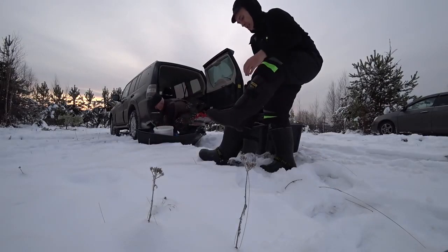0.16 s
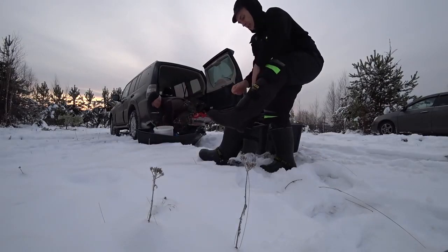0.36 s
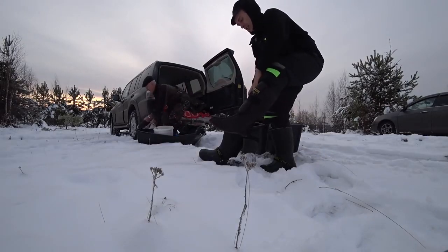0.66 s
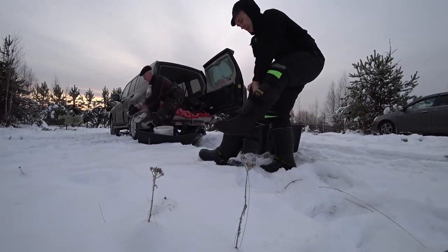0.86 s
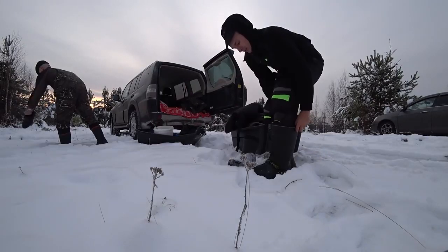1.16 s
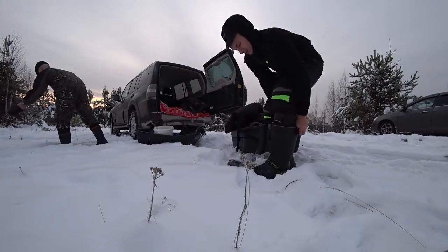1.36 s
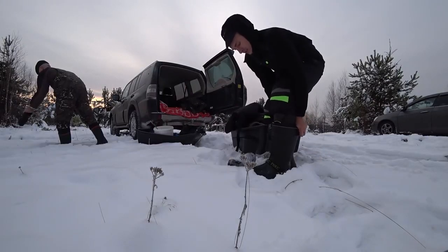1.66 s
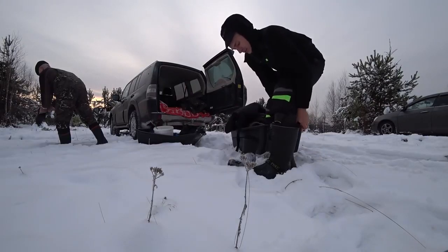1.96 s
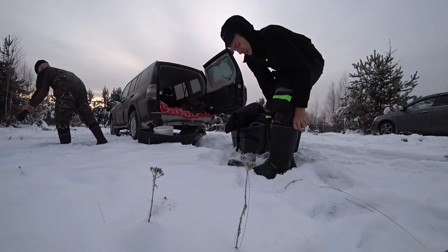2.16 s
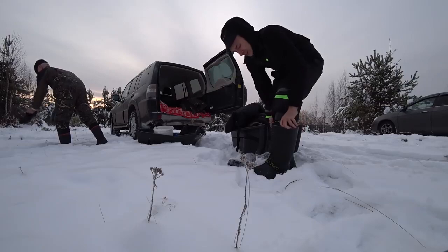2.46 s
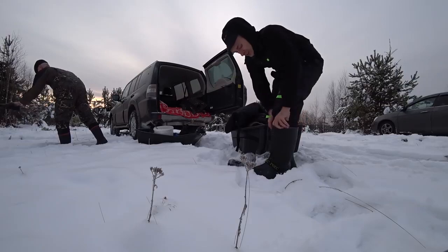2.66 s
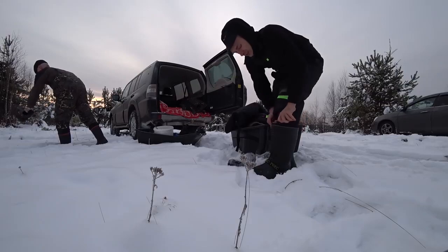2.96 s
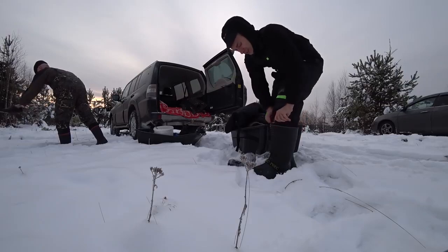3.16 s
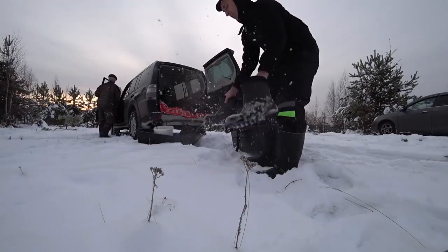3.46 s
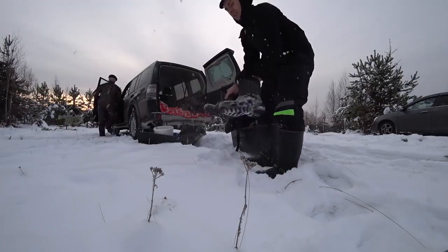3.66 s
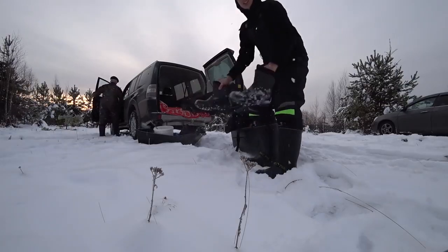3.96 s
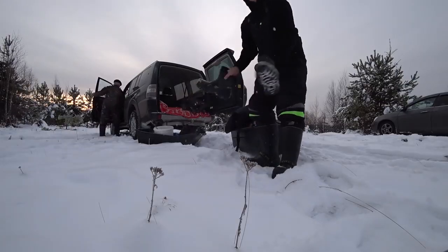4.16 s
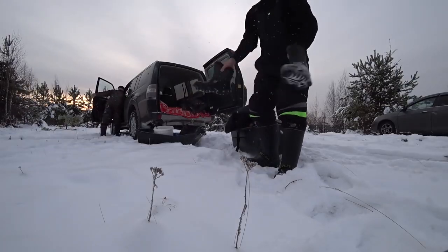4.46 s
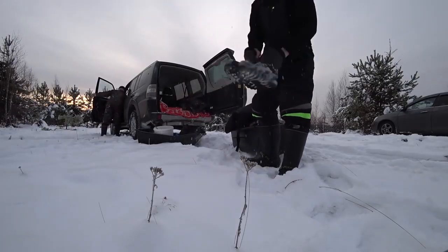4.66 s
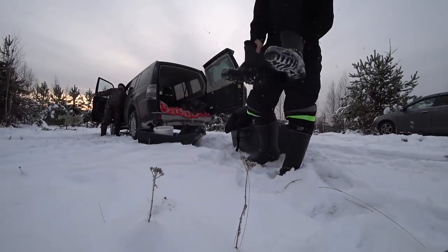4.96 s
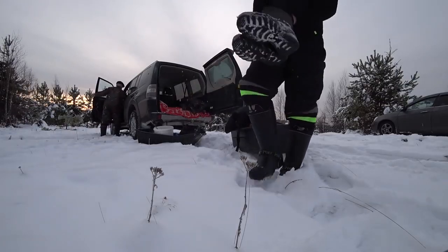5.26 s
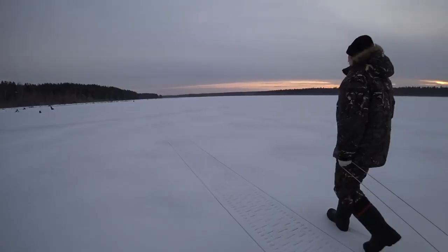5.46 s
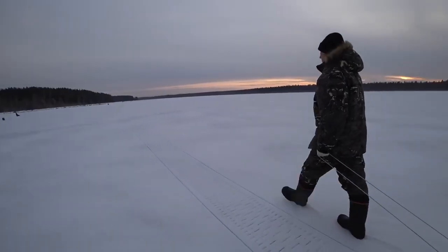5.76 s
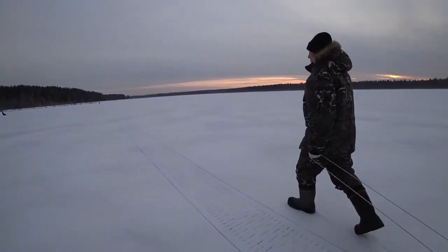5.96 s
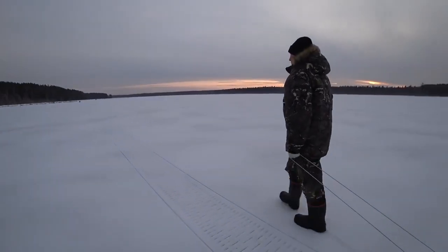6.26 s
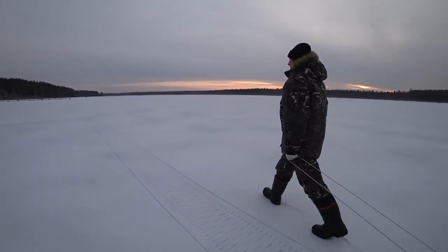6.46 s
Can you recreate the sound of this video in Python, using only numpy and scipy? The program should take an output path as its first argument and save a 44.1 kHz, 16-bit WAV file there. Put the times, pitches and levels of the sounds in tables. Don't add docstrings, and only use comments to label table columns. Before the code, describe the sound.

A still snowy yard, heard within arm's reach, dry and open. From 0 to 1 s there is cloth rustle, soft scuffs, faint far steps and a few dull bumps and ticks. At 1.1 s a frozen boot, left of centre, is struck hard: hollow rubber thud, brittle ice crack, scraping and a shower of crumbs. More sharp knocks follow near 1.6, 2.06, 2.47 and 2.94 s, crumbs fading between them. Around 3.3 s light taps and rustling mark the boots changing hands. Sole-on-sole claps sound in front at 3.8, 4.3, 4.75 and 5.15 s, with rattles, cracks and falling bits. At 5.44 s it cuts abruptly to an open lake: a steady sled hiss grows, wind rumbles unevenly on the microphone, and boots crunch close by, strongest near 5.8, 5.95 and 6.4 s, until the end.

```python
import sys
import numpy as np
from scipy import signal
from scipy.fft import rfft, irfft, next_fast_len
from scipy.io import wavfile
from scipy.ndimage import uniform_filter1d

SR = 44100
rng = np.random.default_rng(int(sys.argv[2]) if len(sys.argv) > 2 else 0)


def natural_amplitude(level_db):
    exponent = np.asarray(level_db, float) / 20
    return 10 ** exponent


def bounce(signal):
    frames = np.transpose(np.atleast_2d(signal))
    limited = np.clip(frames, -1, 1)
    pcm = np.round(limited * 32767).astype(np.int16)
    wavfile.write(sys.argv[1], SR, pcm)


N = 290839

# (frequency [Hz], density [dB per Hz])
YARD_COLOUR = [(15, -37), (30, 4), (124, 6), (254, -3.5), (353, -6), (778, -2.5), (862, -4.5), (1060, -7),
               (1850, -8.5), (4180, -10), (11000, -18), (11250, -19), (11500, -75), (22000, -120)]
LAKE_COLOUR = [(15, -29), (24, 8), (45, -7), (69, -9), (207, -10), (303, -4), (588, -8.5), (884, -9.5),
               (1800, -10), (4180, -11.5), (8970, -16.5), (10200, -15.5), (11000, -19), (11250, -20),
               (11500, -75), (22000, -120)]
# (frequency [Hz], likeness [0-1])
YARD_SAME = [(60, 1), (170, 0.82), (490, 0.61), (1390, 0.39), (3970, 0.89), (11300, 0.6)]
LAKE_SAME = [(60, 0.89), (170, 0.91), (490, 0.96), (1390, 0.58), (3970, 0.79), (11300, 0.36)]
# (frequency [Hz], left over right [dB])
YARD_PAN = [(1000, -0.2)]
LAKE_PAN = [(60, -1.5), (220, -0.5), (820, -4.5), (3060, -3), (11300, -2.5)]
# (time [s], level [dB])
RUMBLE = [(0.0, -61.5), (0.55, -57), (0.73, -65), (1.3, -52), (1.34, -63), (1.74, -65), (2.19, -56),
          (2.4, -69), (2.81, -64), (3.13, -67), (3.33, -61), (3.38, -55), (3.6, -53), (3.88, -56),
          (4.09, -63), (4.37, -52), (4.97, -59.5), (5.3, -58), (5.43, -59)]
# (time [s], level [dB])
WIND = [(5.45, -45), (5.56, -43), (5.69, -49), (5.78, -43), (5.83, -42), (5.87, -49), (5.91, -42),
        (6.0, -44), (6.1, -47), (6.25, -44), (6.3, -51), (6.38, -42), (6.44, -48), (6.5, -48), (6.53, -41),
        (6.59, -48)]
# (peak time [s], level [dB], rise [s per 10 dB], fall [s per 10 dB], sheen re level
# [dB])
RUSTLES = [(0.0, -52, .1, .3, -7), (.24, -57, .05, .05, -12), (.325, -45, .012, .12, -7),
           (.88, -45, .15, .2, -8), (1.0, -47, .08, .03, -8), (1.53, -54.5, .5, .05, -9),
           (2.04, -48, .13, .03, -8), (2.2, -54, .1, .3, -3), (2.55, -52.5, .3, .2, -2),
           (2.9, -57, .2, .1, -2), (3.11, -57, .15, .05, 3), (3.29, -54.5, .07, .03, 0),
           (3.38, -50, .03, .1, -5), (3.43, -49, .08, .045, -6), (3.52, -57, .05, .2, 0),
           (3.76, -54.5, .06, .03, -8), (3.92, -50, .03, .18, -5), (4.12, -54, .08, .4, -4),
           (4.46, -52, .1, .2, -7), (4.655, -51, .05, .18, -12), (4.95, -54, .2, .3, -3),
           (5.12, -52.5, .06, .3, -3), (5.32, -56, .05, .2, 2), (5.44, -46, .06, .1, -8)]
# (time [s], level [dB], fall [s per 10 dB], crunch re level [dB])
SHOWERS = [(1.128, -37, .07, -5), (1.25, -52, .07, 1), (1.618, -48, .05, 0), (1.85, -60, .06, 6),
           (2.062, -44, .05, -3), (2.18, -56, .06, 5), (2.47, -50, .05, 0), (2.54, -59, .12, 5),
           (2.94, -38, .025, -3), (2.97, -53, .08, 5), (3.995, -56, .05, 6), (3.82, -43, .09, -6),
           (4.3, -40, .06, -1), (4.664, -44, .025, -1), (4.748, -43, .1, 1), (5.203, -47, .08, -6)]
# (peak time [s], level [dB], rise [s per 10 dB], fall [s per 10 dB], sheen re level [dB])
STEPS = [
    (5.61, -43, .06, .1, -2),
    (5.772, -35, .02, .2, -4),
    (5.81, -37, .04, .06, -3),
    (5.951, -37, .04, .1, -6),
    (6.11, -42, .03, .05, -6),
    (6.24, -43, .03, .05, -8),
    (6.39, -33.5, .03, .14, -4),
    (6.55, -50, .06, .1, 2),
]
# (time [s], length [s], level [dB], centre [Hz], width [Hz])
SCUFFS = [(0.225, 0.035, -48, 3600, 900), (0.677, .035, -49, 4900, 2200), (1.133, .03, -34, 2500, 1200),
          (1.133, .05, -34, 4400, 1400), (1.152, .02, -34, 2300, 1000), (1.17, .05, -39, 2430, 450),
          (1.135, .09, -39, 900, 700), (1.19, .025, -39, 4300, 2400), (1.196, .025, -52, 8500, 4000),
          (1.2, .07, -42, 2430, 450), (1.2, .06, -47, 4500, 1200), (1.25, .045, -44, 2350, 600),
          (1.254, .035, -48, 4200, 2000), (1.292, .018, -46, 350, 300), (.84, .04, -49, 4000, 1800),
          (.878, .09, -47, 1000, 900), (.94, .04, -49, 2000, 1200), (.996, .02, -43, 1500, 2200),
          (1.628, .012, -43, 3500, 4000), (1.645, .022, -50, 4400, 1500), (2.063, .014, -36, 3200, 900),
          (2.063, .022, -40, 1500, 1200), (2.478, .04, -44, 2900, 1600), (2.944, .014, -34, 750, 250),
          (3.828, .03, -42, 3000, 3000), (4.31, .03, -42, 4300, 1800), (4.32, .022, -40, 2000, 2000),
          (4.66, .024, -40, 2600, 2200), (4.766, .016, -41, 3200, 3000), (5.197, .011, -36, 4800, 3400),
          (5.238, .009, -33, 3200, 4400), (5.208, .03, -46, 3500, 4000), (3.4, .055, -47, 4200, 2600),
          (3.604, 0.14, -52, 3760, 1900), (5.93, 0.06, -31, 1150, 600), (6.515, 0.08, -34, 850, 500),
          (5.72, .05, -39, 500, 500), (5.96, .08, -36, 300, 200), (5.755, .11, -37, 4300, 3600),
          (5.442, 0.012, -41, 9500, 2900)]
# (time [s], blow [dB], shaft [Hz], sole [Hz], sole over shaft [dB])
LEFT_THUDS = [(0.333, -35, 102, 480, 18), (0.995, -32, 150, 676, 8), (1.093, -38.5, 231, 870, 25),
              (1.123, -22, 153, 947, 10), (1.127, -12, 170, 800, 4), (1.601, -33.5, 308, 382, 3),
              (1.611, -20, 150, 760, 12), (1.616, -11, 304, 495, 32), (1.63, -19, 130, 440, 3),
              (1.975, -38, 183, 689, 6), (2.0575, -11.5, 312, 505, 37), (2.067, -25, 121, 440, 0),
              (2.452, -18, 200, 430, 12), (2.466, -19, 210, 480, 5), (2.477, -21.5, 139, 480, 2),
              (2.938, -5.5, 170, 520, 4), (2.932, -24, 240, 600, 15), (2.975, -33, 123, 640, 3),
              (3.051, -32.5, 211, 640, 9), (3.075, -32.5, 182, 520, 9)]
# (time [s], blow [dB], shaft [Hz], sole [Hz], sole over shaft [dB])
TAPS = [
    (3.2815, -31, 230, 650, 6),
    (3.362, -32, 240, 770, 0),
    (3.396, -29, 199, 845, 8),
    (3.468, -36, 324, 530, 17),
    (4.456, -32, 94, 790, 18),
    (5.2255, -28, 231, 775, 8),
]
# (time [s], blow [dB], shaft [Hz], sole over shaft [dB], 60 dB decay [s])
FRONT_THUDS = [(3.679, -39, 123, -20, .025), (3.752, -36, 129, -10, .04), (3.815, -7.5, 245, -12, .06),
               (3.831, -19, 190, 0, .06), (4.122, -36, 151, 6, .07), (4.194, -28, 246, -5, .025),
               (4.273, -37, 249, -14, .04), (4.2975, -6.5, 205, 0, .06), (4.315, -22, 200, -14, .06),
               (4.516, -38.5, 179, -23, .025), (4.618, -31, 134, -22, .022), (4.666, -27, 156, -2, .08),
               (4.69, -33, 130, -20, .12), (4.7422, -4, 230, 4, .048), (4.755, -20, 160, 6, .06),
               (4.775, -25, 141, -8, .06), (4.914, -23, 149, -25, .018), (5.135, -14.5, 240, -12, .035),
               (5.1455, -2, 215, -5, .033), (5.18, -19, 324, 6, .028), (5.1995, -24, 300, 8, .02),
               (5.2012, -12.5, 224, -12, .045), (5.243, -28.5, 195, -9, .055), (5.264, -35, 200, -25, .05)]
# (time [s], peak [dB], ring [Hz], treble fizz [dB])
LEFT_CRACKS = [(1.0937, -29, 3660, -12), (1.1257, -1, 1740, -11), (1.1265, -6, 2900, -14),
               (1.1275, -4, 2780, -14), (1.131, -14, 1810, -21), (1.5998, -33, 3500, -5),
               (1.611, -21, 3000, -8), (1.613, -22, 4000, -8), (1.6159, -5, 3600, -30),
               (1.617, -9, 1600, -30), (2.0495, -30, 4800, 8), (2.0552, -8, 1600, -6),
               (2.0571, -5, 3250, -8), (2.0586, -11, 3100, 0), (2.0631, -19, 3140, -14),
               (2.065, -21, 6300, -10), (2.452, -28, 6000, 6), (2.4536, -12, 1050, -20),
               (2.4578, -24, 3200, -12), (2.4662, -5, 2200, -22), (2.4664, -11, 4000, -24),
               (2.4663, -13, 8400, -16), (2.468, -13, 2900, -15), (2.932, -17, 2410, 0),
               (2.936, -5, 2900, -28), (2.9385, -6, 3400, -23), (2.9413, -13, 6500, -8),
               (2.9418, -6, 2000, -24)]
# (time [s], peak [dB], ring [Hz], treble fizz [dB])
FRONT_CRACKS = [(3.8142, -2.5, 3400, -8), (3.8152, -10, 1400, -20), (3.8182, -13, 3000, -18),
                (3.8457, -22, 1890, -12), (3.8942, -29, 4000, 6), (3.9006, -13, 6150, 14),
                (3.9012, -19, 1800, 0), (3.9035, -17, 8500, 12), (3.9105, -32, 3000, 12),
                (4.2962, -16, 3600, -5), (4.297, -2, 3300, -12), (4.298, -6, 720, -25),
                (4.2993, -6, 4740, -12), (4.3032, -13, 3700, 0), (4.6615, -24, 3300, -23),
                (4.6698, -17, 1050, -30), (4.7422, -9, 4200, 0), (4.746, -13, 4550, -8),
                (4.7511, -18, 1780, -20), (4.7746, -25, 2930, -15), (5.133, -19, 2600, 6),
                (5.1345, -19, 4200, 8), (5.1442, -8, 1900, -15), (5.1804, -13, 2400, -15),
                (5.1976, -22, 3180, 10), (5.2, -16, 4420, 3), (5.2252, -19, 3000, 8), (5.241, -23, 3120, 0),
                (5.243, -24, 5800, -5), (5.2628, -25, 3400, 0)]
# (time [s], peak [dB], ring [Hz])
TICKS = [(0.8876, -29, 2450), (0.988, -25, 5430), (0.9975, -20, 1840), (1.9758, -20.5, 2450),
         (3.0748, -30, 1430), (3.2885, -19, 1600), (3.3464, -24, 3850), (3.3962, -26, 3260),
         (3.4415, -29, 3630), (3.774, -32, 3750), (4.1174, -25, 2910), (4.2717, -27, 3550),
         (4.3662, -29, 4220), (4.4201, -28, 2820), (4.4947, -32, 4740), (4.827, -29, 2410),
         (5.0983, -24.5, 6000), (5.111, -28, 2840)]
# (time [s], peak [dB], ring [Hz])
SNAPS = [(3.3744, -32, 4450), (3.4316, -29, 4700), (4.4543, -30, 9000), (4.459, -31, 2900),
         (4.502, -36, 6500), (4.007, -35, 5000), (4.042, -37, 6000), (4.582, -37, 5000), (3.555, -38, 5000),
         (1.1165, -40, 5000), (4.7972, -30, 3620), (4.8194, -32, 3140)]

LAKE_FROM_S = 5.44
LEFT_FROM_S, FRONT_FROM_S = 1.05, 3.2


def evened(x):
    return x / np.sqrt(np.mean(x ** 2) + 1e-20)


def read(points, hz):
    f, value = np.transpose(points)
    return np.interp(np.log(hz + 1), np.log(f + 1), value)


def add(mix, s, sound):
    part = mix[:, round(s * SR):][:, :sound.shape[1]]
    part += sound[:, :part.shape[1]]


def sides(pan_db):
    return natural_amplitude(np.array([[pan_db / 2], [-pan_db / 2]]))


def ring(hz, t60, t):
    return -np.sin(2 * np.pi * hz * t) * natural_amplitude(-60 * t / t60)


def burst(band, noise, shape):
    return evened(signal.lfilter(*band, noise) * shape) * np.sqrt(np.mean(shape ** 2))


def grains(per_s, spread_db, grain_s, smooth):
    size = natural_amplitude(spread_db * np.minimum(rng.exponential(1, N), 4))
    breaks = size * (rng.random(N) < per_s / SR)
    decay = np.exp(-1 / (grain_s * SR))
    return smooth + evened(signal.lfilter([1], [1, -decay], breaks))


def clumps(depth_db, clump_s):
    width = int(clump_s * SR)
    wander = uniform_filter1d(uniform_filter1d(rng.standard_normal(N), width), width)
    return evened(natural_amplitude(depth_db * evened(wander)))


def levels(bed_db, gain_db_per_s, start_s, swells):
    s = np.arange(0, N / SR + .01, .002)
    power = natural_amplitude(2 * (np.array(bed_db)[:, None] + gain_db_per_s * (s - start_s)))
    for peak_s, db, rise_s, fall_s, sheen_db, crunch_db in swells:
        before = (peak_s - s) / max(rise_s, .001)
        after = (s - peak_s) / max(fall_s, .005)
        away = np.where(s < peak_s, before, after)
        layers_db = db + np.array([[0], [sheen_db], [crunch_db]])
        power = power + natural_amplitude(2 * (layers_db - 10 * away))
    level_db, sheen_db, crunch_db = 10 * np.log10(power)
    return np.transpose([s, level_db, sheen_db - level_db, crunch_db - level_db])


def yard_levels():
    rustles = [(*row, -6) for row in RUSTLES]
    rise_s, sheen_db = .003, -23
    showers = [(s, db, rise_s, fall_s, sheen_db, crunch_db) for s, db, fall_s, crunch_db in SHOWERS]
    still_db = (-63.5, -68, -65)
    return levels(still_db, 0, 0, rustles + showers)


def lake_levels():
    steps = [(*row, -10) for row in STEPS]
    sled_db = (-41, -47, -40)
    return levels(sled_db, 4, LAKE_FROM_S, steps)


def friction(rows, low, colour, same, pan, edges_hz, grit, depth_db, calm_db):
    s, level_db, sheen_db, crunch_db = np.transpose(rows)
    size = next_fast_len(N)
    hz, t = np.fft.rfftfreq(size, 1 / SR), np.arange(N) / SR
    left, other = rfft(grit * rng.standard_normal((2, N)), size)
    like = np.clip(read(same, hz), 0, 1)
    right = like * left + np.sqrt(1 - like ** 2) * other
    pair = np.array([left, right])
    pair *= natural_amplitude(read(colour, hz) + np.outer([.5, -.5], read(pan, hz)))
    below = [0 * hz] + [1 / (1 + (hz / edge) ** 6) for edge in edges_hz] + [1 + 0 * hz]
    layer_levels = [np.transpose(low)] + [(s, level_db + db) for db in (crunch_db, 0, sheen_db)]
    shower_db = .18 * np.maximum(np.interp(t, s, level_db) - calm_db, 0)
    out = np.zeros((2, N))
    for k, level in enumerate(layer_levels):
        layer = irfft(pair * np.sqrt(below[k + 1] - below[k]), size)[:, :N]
        uneven = clumps(depth_db[k] + shower_db, clump_s=0.0036)
        out += natural_amplitude(np.interp(t, *level)) * evened(layer) * uneven
    return out


def yard_friction():
    grit = grains(per_s=990, spread_db=2.5, grain_s=0.00088, smooth=2.76)
    return friction(yard_levels(), RUMBLE, YARD_COLOUR, YARD_SAME, YARD_PAN, edges_hz=(300, 1200, 6000),
                    grit=grit, depth_db=(3, 1.8, .8, .4), calm_db=-47)


def lake_friction():
    grit = grains(per_s=1200, spread_db=2.0, grain_s=0.0025, smooth=2.2)
    return friction(lake_levels(), WIND, LAKE_COLOUR, LAKE_SAME, LAKE_PAN, edges_hz=(170, 1200, 6000),
                    grit=grit, depth_db=(1.5, 1.4, .5, .3), calm_db=-33)


def scuffs(grit):
    out, t = np.zeros((2, N)), np.arange(9000) / SR
    for s, length_s, db, hz, width_hz in SCUFFS:
        noise = rng.standard_normal((3, 9000)) * grit[round(s * SR) // 2:][:9000]
        stereo = noise[0] + 0.23 * noise[1:]
        band = signal.butter(2, [hz - width_hz / 2, hz + width_hz / 2], "band", fs=SR)
        swell = np.sin(np.pi * np.clip(t / length_s, 0, 1) ** 0.45)
        pan_db = 3.5 * (LEFT_FROM_S < s < FRONT_FROM_S) - 2.6 * (s > LAKE_FROM_S)
        add(out, s, natural_amplitude(db) * sides(pan_db) * burst(band, stereo, swell))
    return out


def struck_t60(db):
    return .052 - .0004 * (db + 40) - .012 * (db > -10)


def thuds():
    out, t = np.zeros((2, N)), np.arange(6000) / SR
    slap_filter = signal.butter(3, (800, 1400), "band", fs=SR)
    front_sole_hz = 395
    single = [(*row, struck_t60(row[1])) for row in LEFT_THUDS + TAPS]
    front = [(s, db, shaft_hz, front_sole_hz, sole_db, t60) for s, db, shaft_hz, sole_db, t60 in FRONT_THUDS]
    for s, db, shaft_hz, sole_hz, sole_db, t60 in single + front:
        t60 = max(t60, .008)
        body = ring(shaft_hz, t60, t) + natural_amplitude(sole_db) * ring(sole_hz, 0.45 * t60, t)
        rattle_filter = signal.butter(3, [0.59 * sole_hz, 1.9 * sole_hz], "band", fs=SR)
        rattle = burst(rattle_filter, rng.standard_normal(6000), natural_amplitude(-16 - 60 * t / (1.3 * t60)))
        slap_shape = natural_amplitude(-11 + .3 * db - 60 * t / .02)
        slap = burst(slap_filter, rng.standard_normal(6000), slap_shape)
        pan_db = 2.5 if s < FRONT_FROM_S else -.6
        blow = body / abs(body).max() + rattle + slap
        add(out, s, natural_amplitude(db) * sides(pan_db) * blow * np.minimum(t / 0.001, 1))
    thin = signal.butter(2, 75, "high", fs=SR)
    return signal.lfilter(*thin, out)


def placed_cracks():
    tick_fizz_db, snap_fizz_db = -10, 14
    ticks = [(*row, tick_fizz_db) for row in TICKS]
    snaps = [(*row, snap_fizz_db) for row in SNAPS]
    left_pan_db, front_pan_db, scatter_db = 6, -.4, 3.5
    rows = [(*row, left_pan_db) for row in LEFT_CRACKS]
    rows += [(*row, front_pan_db) for row in FRONT_CRACKS + ticks + snaps]
    return [(*row[:-1], row[-1] + scatter_db * rng.uniform(-1, 1)) for row in rows]


def cracks():
    out, t = np.zeros((2, N)), np.arange(600) / SR
    fizz_filter = signal.butter(2, [5500, 12500], "band", fs=SR)
    onset = np.sin(np.pi / 2 * np.minimum(t / 0.00015, 1)) ** 2
    for s, db, hz, fizz_db, pan_db in placed_cracks():
        a, b = rng.standard_normal((2, 3, 600))
        band = signal.butter(3, [hz * .55, hz * 1.4], "band", fs=SR)
        splinters = burst(band, a[0] + .5 * a[1:], natural_amplitude(-15 - 60 * t / 0.016))
        fizz = burst(fizz_filter, b[0] + 0.33 * b[1:], natural_amplitude(fizz_db - 17 - 60 * t / 0.0085))
        crack = ring(hz, .0026, t) + splinters + fizz
        add(out, s, natural_amplitude(db) * sides(pan_db) * onset * crack)
    return out


def scene():
    lake_gain = np.clip((np.arange(N) / SR - LAKE_FROM_S) / 0.0059 + .5, 0, 1)
    background = (1 - lake_gain) * yard_friction() + lake_gain * lake_friction()
    return background + scuffs(clumps(1.8, .002)) + thuds() + cracks()


def low_pass(x):
    return signal.sosfilt(signal.butter(12, 14400, fs=SR, output="sos"), x)


def record(dry):
    steep = signal.firwin(511, 11150, window=("kaiser", 5), fs=SR)
    gentle = signal.firwin(61, 13300, window=("kaiser", 4), fs=SR)
    limited = signal.oaconvolve(dry, steep[None], "same")
    leak = signal.oaconvolve(dry, gentle[None], "same")
    mix = limited + natural_amplitude(-24) * (leak - limited)
    return low_pass(mix)


dry = scene()
out = record(dry)
bounce(out)
```